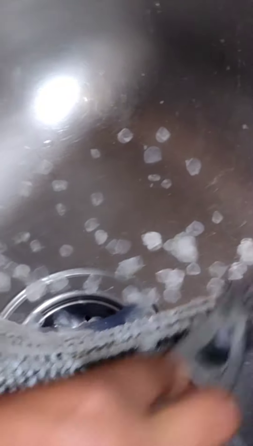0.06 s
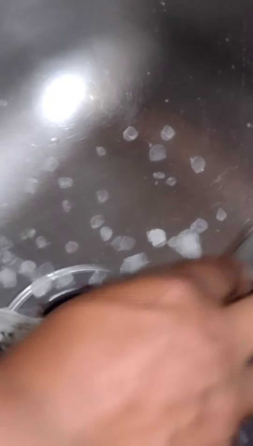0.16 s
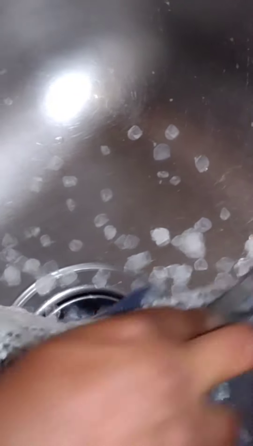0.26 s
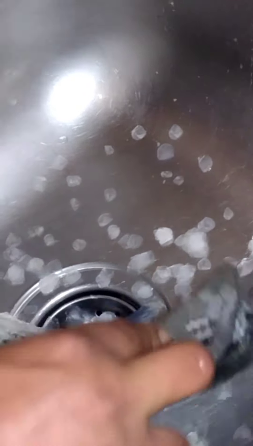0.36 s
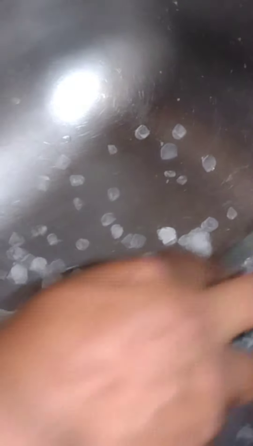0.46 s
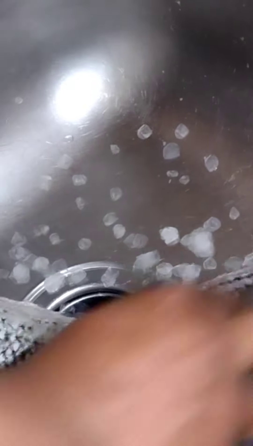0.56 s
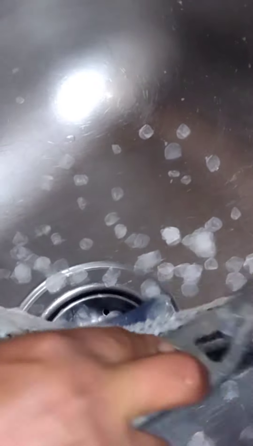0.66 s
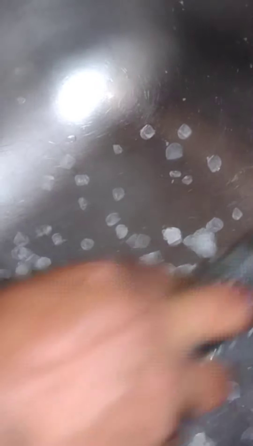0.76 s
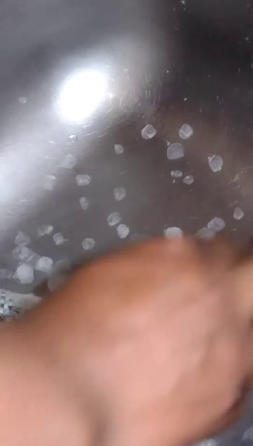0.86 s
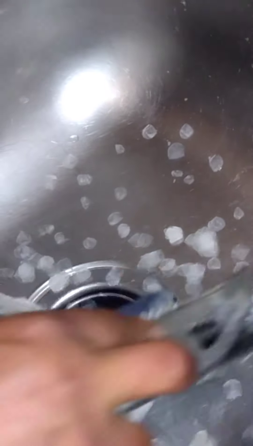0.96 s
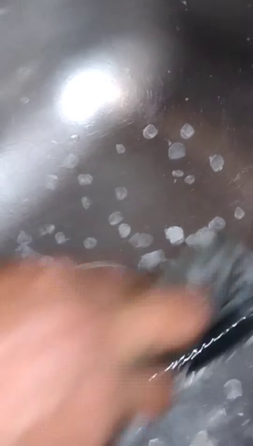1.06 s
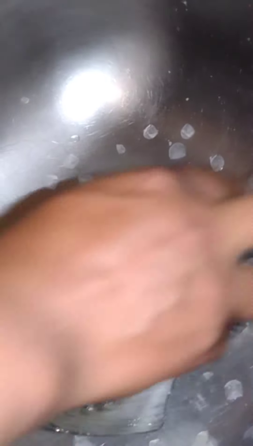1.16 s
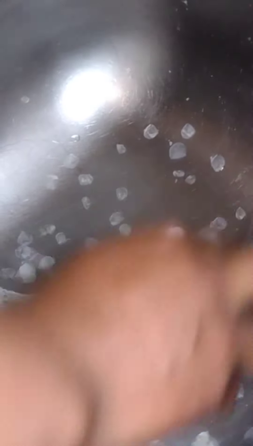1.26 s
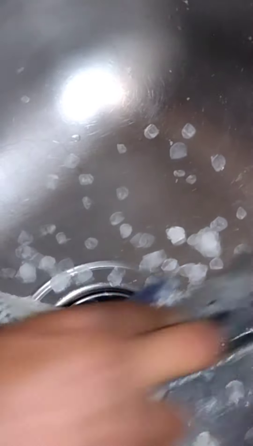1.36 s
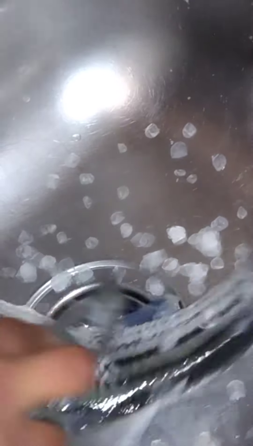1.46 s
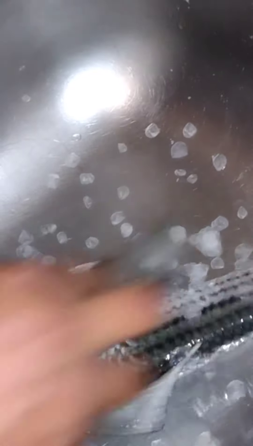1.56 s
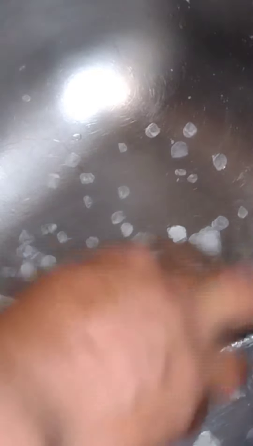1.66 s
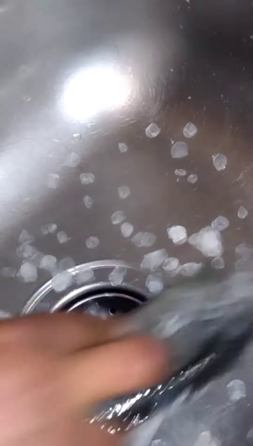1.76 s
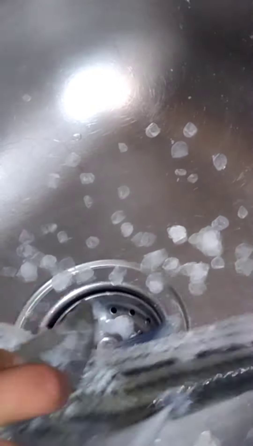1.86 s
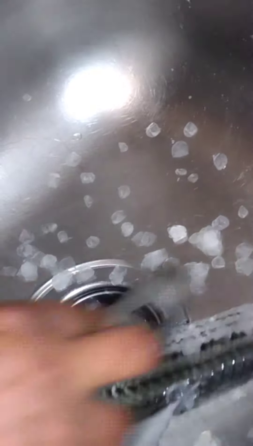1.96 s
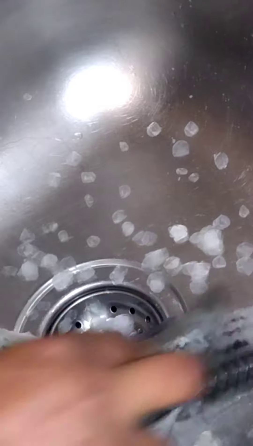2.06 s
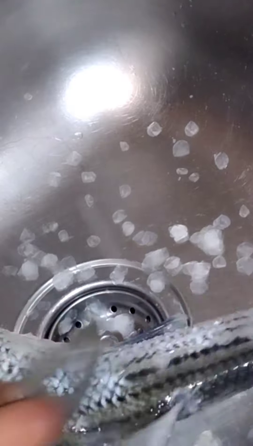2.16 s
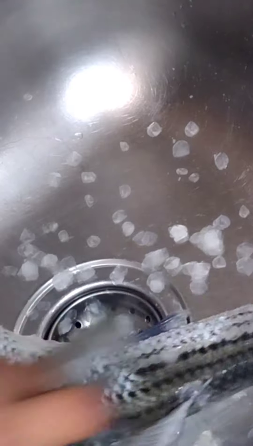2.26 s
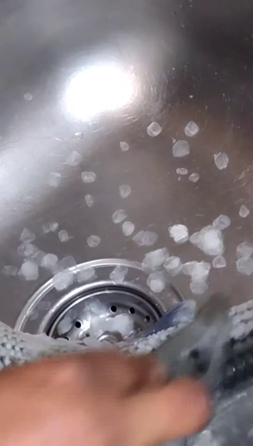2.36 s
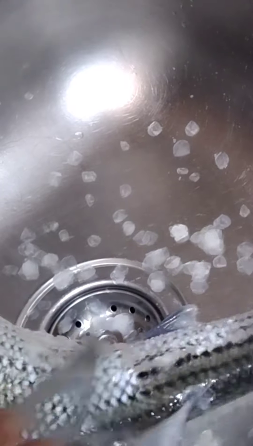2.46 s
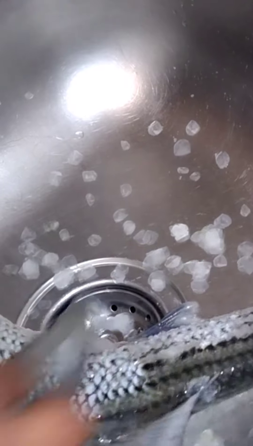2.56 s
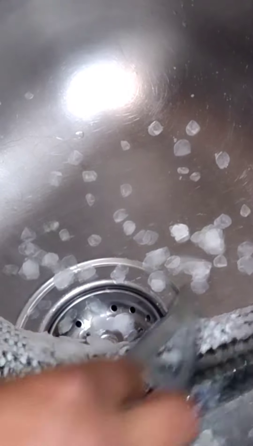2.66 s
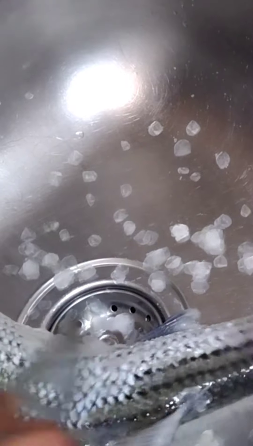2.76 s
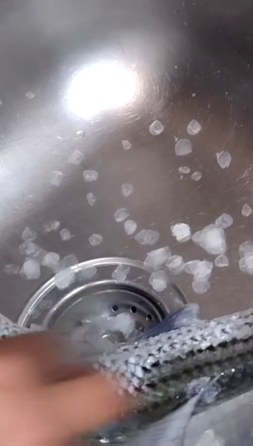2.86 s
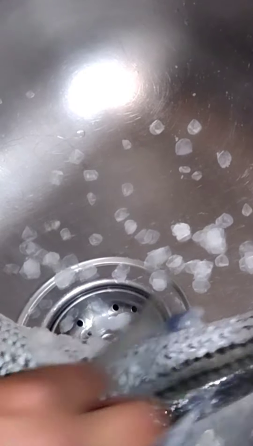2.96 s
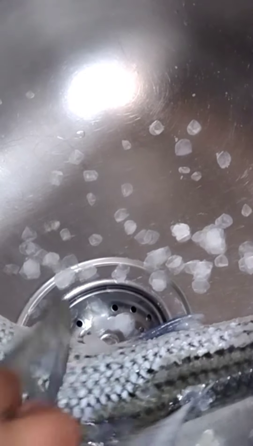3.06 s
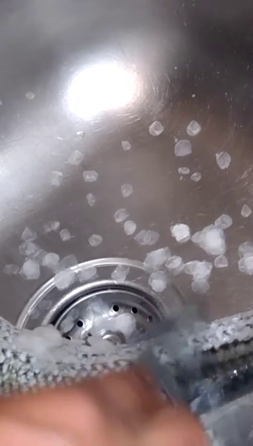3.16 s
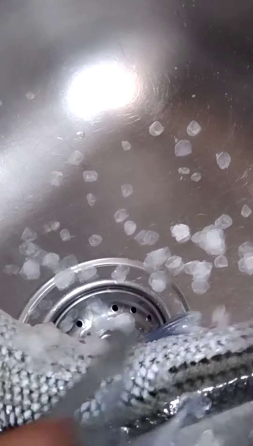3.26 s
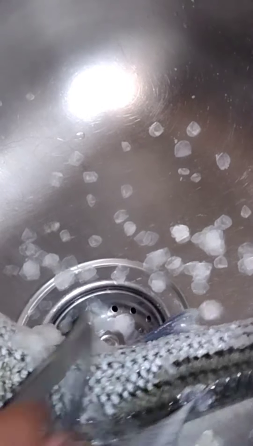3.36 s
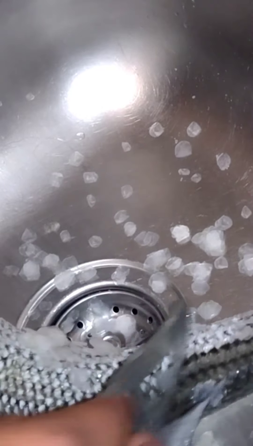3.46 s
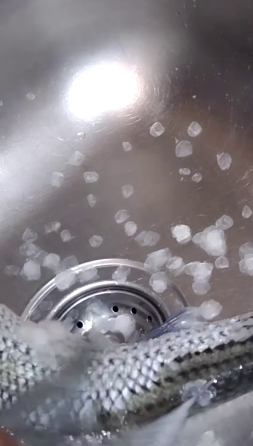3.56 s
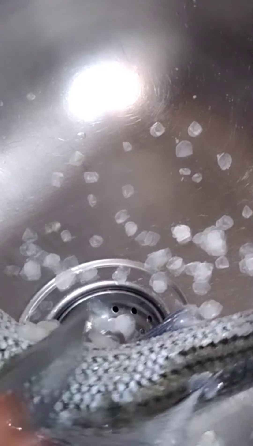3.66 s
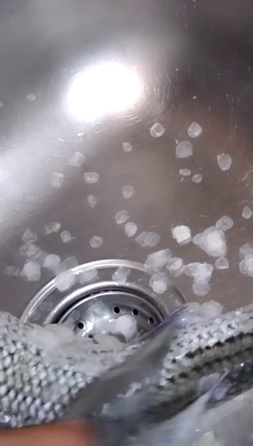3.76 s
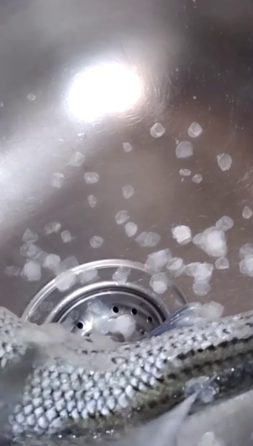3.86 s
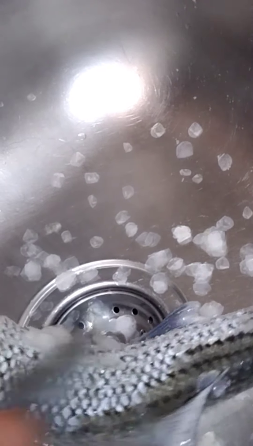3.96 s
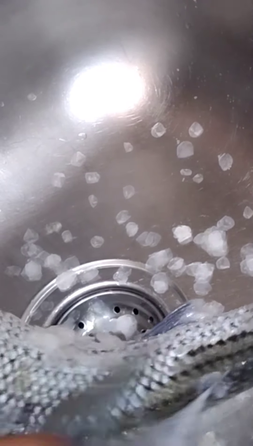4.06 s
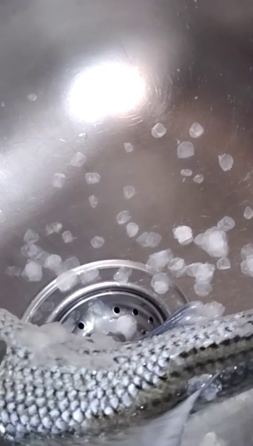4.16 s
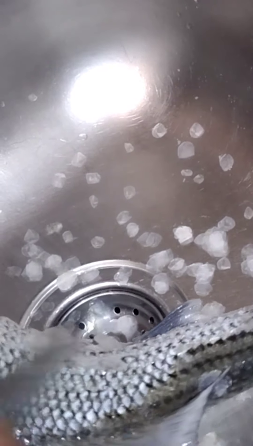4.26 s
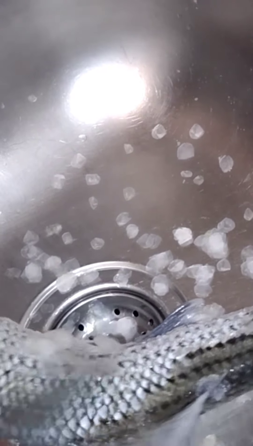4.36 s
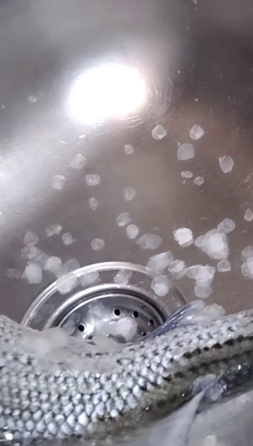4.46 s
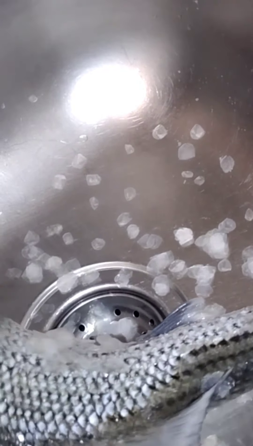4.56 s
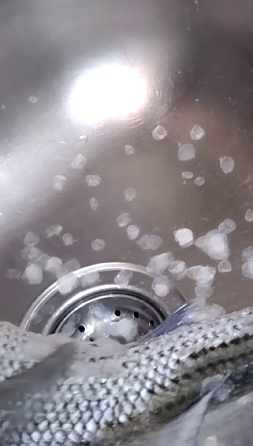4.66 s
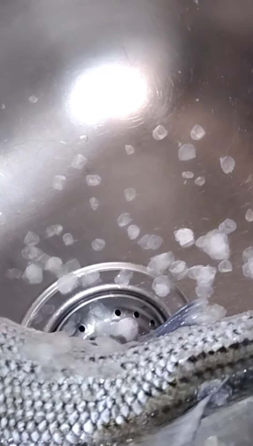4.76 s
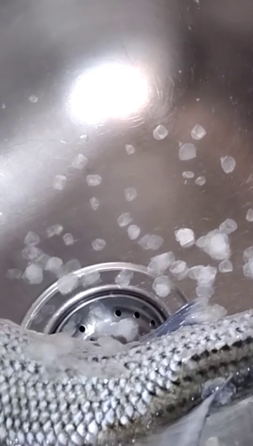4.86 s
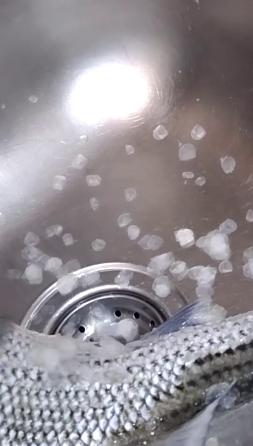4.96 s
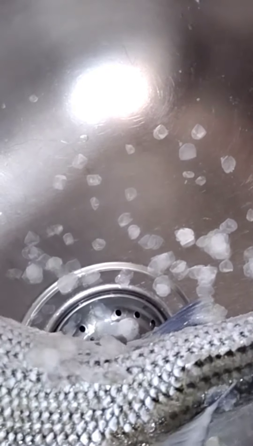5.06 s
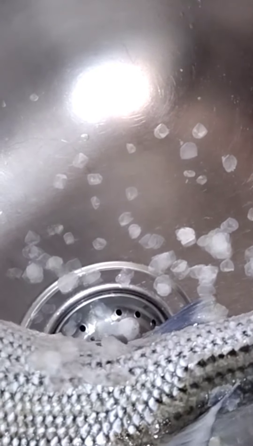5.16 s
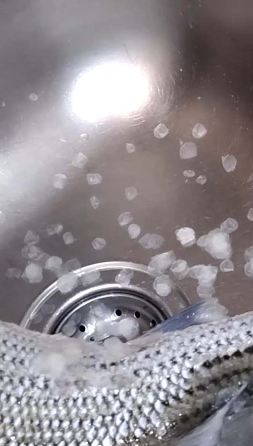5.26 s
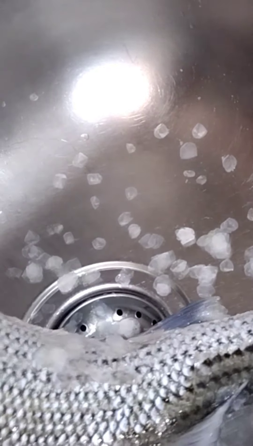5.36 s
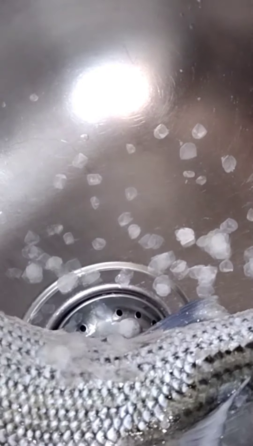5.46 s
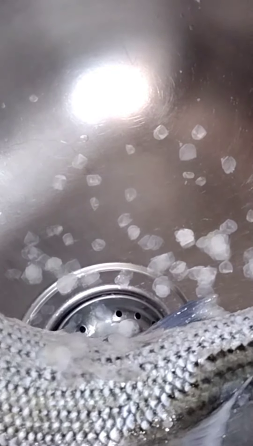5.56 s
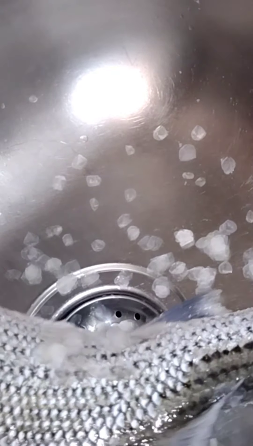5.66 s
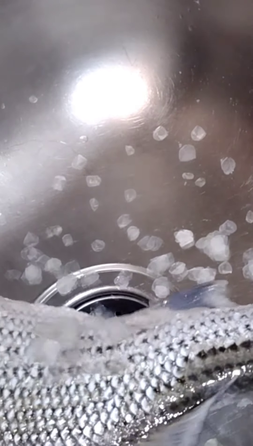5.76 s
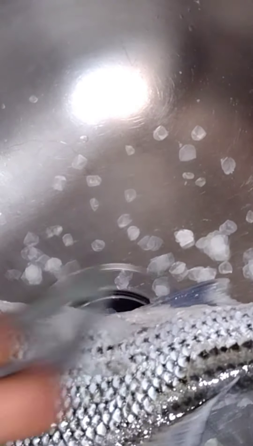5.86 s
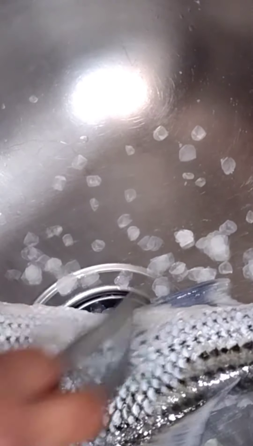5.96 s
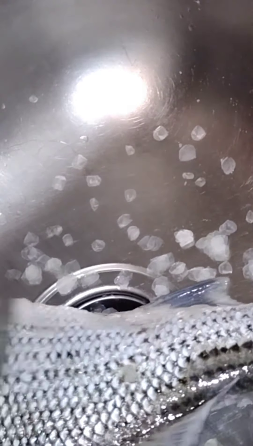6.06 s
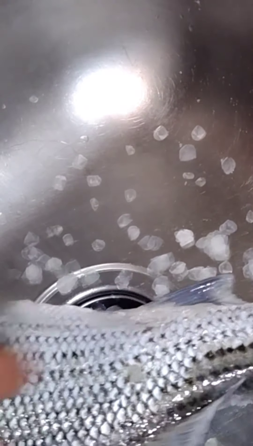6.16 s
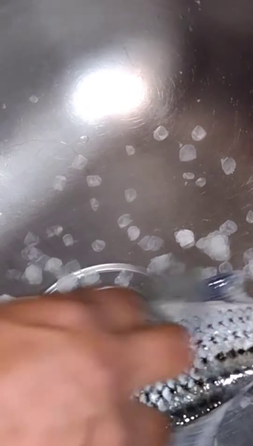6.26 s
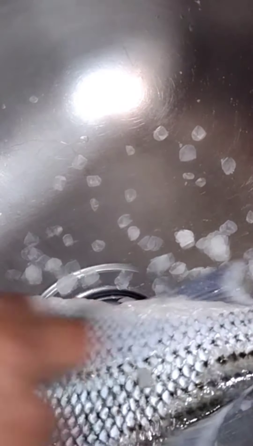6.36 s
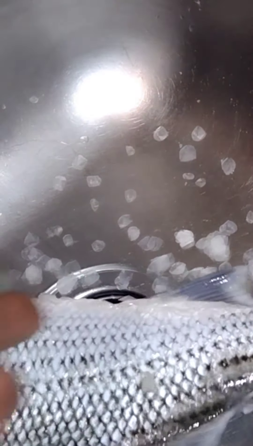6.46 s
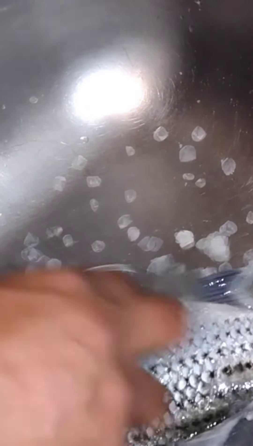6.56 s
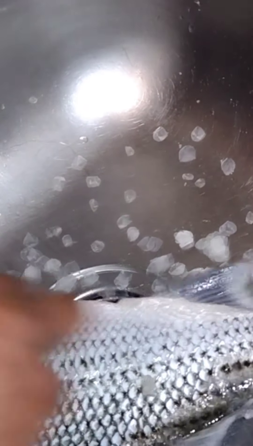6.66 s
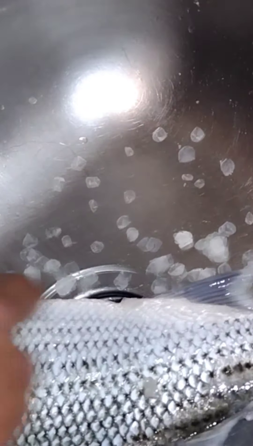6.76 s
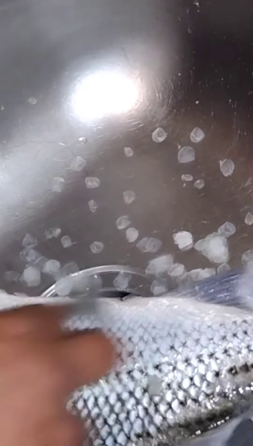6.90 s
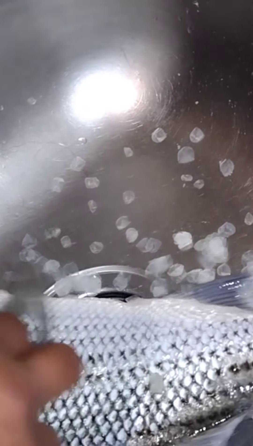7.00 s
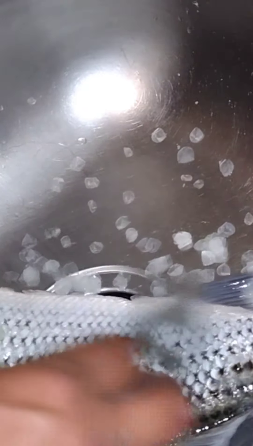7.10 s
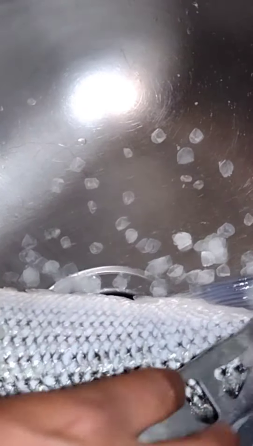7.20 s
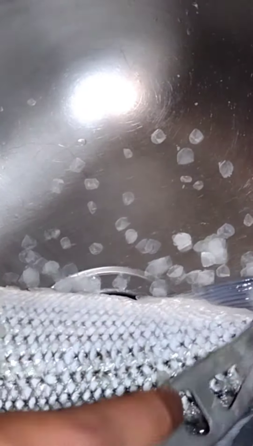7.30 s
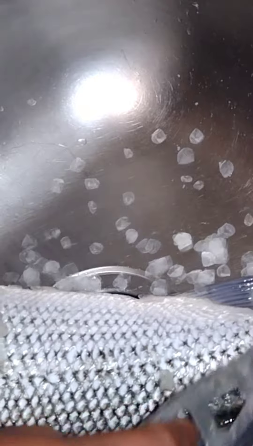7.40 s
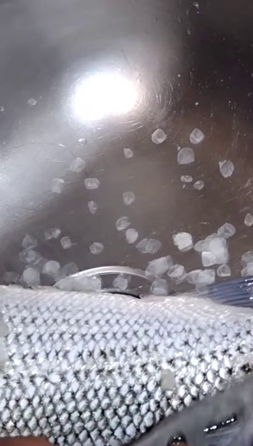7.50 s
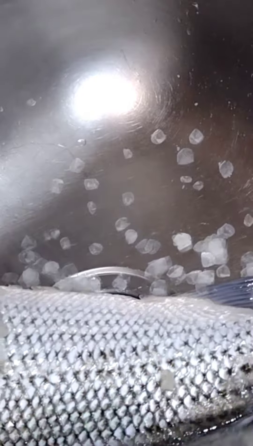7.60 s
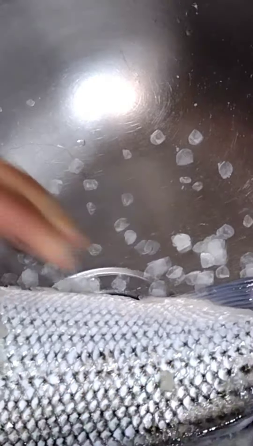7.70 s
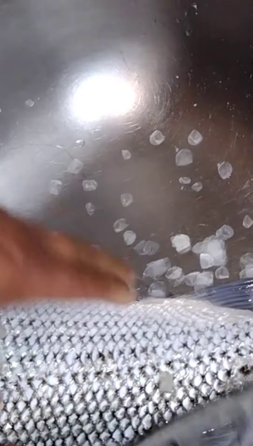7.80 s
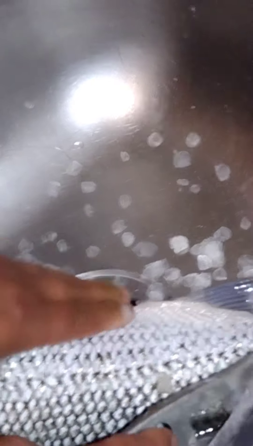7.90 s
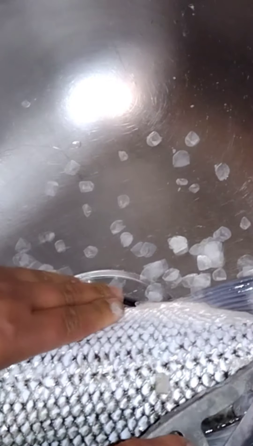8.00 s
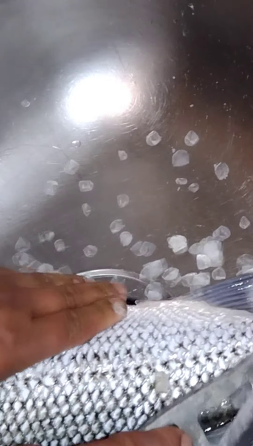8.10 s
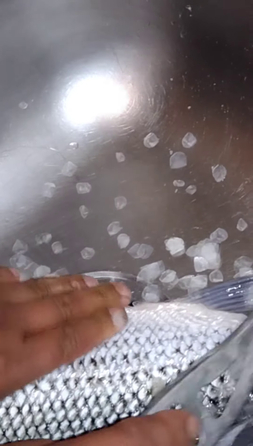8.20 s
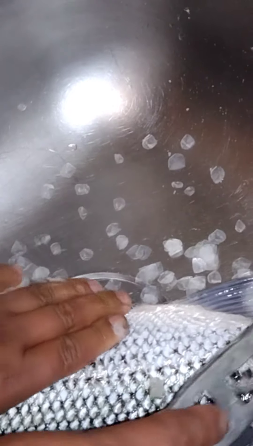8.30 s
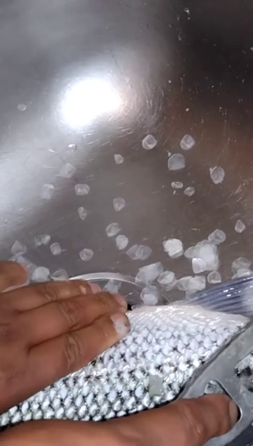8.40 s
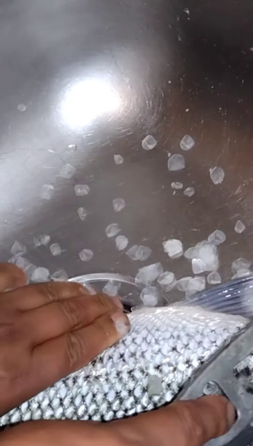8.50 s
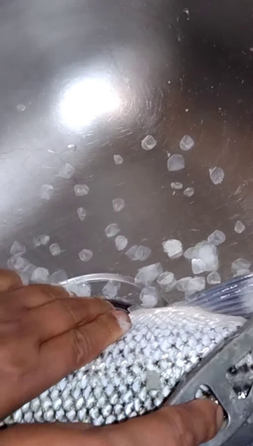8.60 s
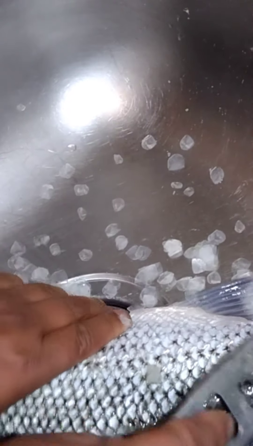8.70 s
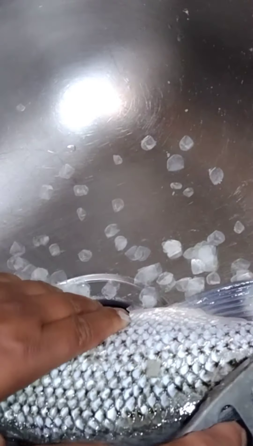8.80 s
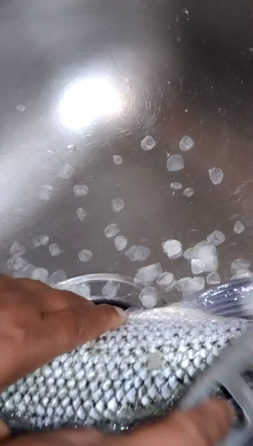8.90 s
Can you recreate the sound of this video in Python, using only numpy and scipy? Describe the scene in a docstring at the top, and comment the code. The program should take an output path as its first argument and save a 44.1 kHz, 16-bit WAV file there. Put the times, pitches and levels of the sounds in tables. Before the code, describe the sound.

Crisp, gritty scraping of fish scales with a thin metallic ring and dull sink thumps, fast then slower, ending in near quiet.

```python
"""A toothed steel scaler is raked over a large fish lying in a steel kitchen sink.
Teeth catch and tear scales: gated noise makes a dense rasp, which rings the tool's resonances.
The tool slides back flat between strokes; each push thuds through the fish into the basin's modes.
At the end the tool and the fingers only brush the skin, over the quiet of the kitchen (steady noise).
Small microphones hear it in stereo, thin in the deep bass and cut at the top."""
import sys
import numpy as np
from scipy import signal
from scipy.io import wavfile
from scipy.ndimage import uniform_filter1d

SR = 44100
rng = np.random.default_rng(int(sys.argv[2]) if len(sys.argv) > 2 else 0)


def inscribe(sig):
    """Save sig as 16-bit PCM at rate SR to the path in sys.argv[1].

    A 1-D sig is mono; a 2-D sig holds one channel per row.
    Samples are clipped to [-1, 1] before scaling.
    """
    pcm = np.round(np.clip(np.atleast_2d(sig).T, -1, 1) * 32767)
    wavfile.write(sys.argv[1], SR, pcm.astype(np.int16))


N = 394254

# Levels in the tables are relative; the mix sets each layer's final loudness.

# Hush of the kitchen: pitch_hz, level_db
KITCHEN_SPECTRUM = [(18, -42), (30, -0.5), (134, 0), (336, -12), (540, -11), (760, -25.5), (913, -20.5),
                    (1910, -18.5), (2230, -30.5), (2980, -28), (16000, -39.5)]
KITCHEN_DB = -59.5

# Pushes that thud the basin: start_s, level_db, walls_db (extra on the wall modes)
THUDS = [(0.032, -44, -13), (0.364, -25, -31), (0.422, -14, -12.5), (0.646, -29.5, -15), (0.721, -35, -7),
         (0.78, -13.5, -12), (1.049, -25, -14), (1.109, -17, -19), (1.222, -24.5, -14), (1.455, -29, -16),
         (1.527, -19.5, -32), (1.617, -23.5, -23), (1.775, -30, -18), (1.844, -21.5, -9),
         (1.964, -16.5, 0.5), (2.229, -48, -24), (2.492, -39, 2), (2.519, -13.5, -21), (2.542, -10.5, -37),
         (2.577, -14.5, -37), (2.801, -10.5, -38), (3.077, -41, -30), (3.315, -19.5, -15),
         (3.351, -13.5, -39), (3.599, -24, -23), (3.619, -40, -25), (3.899, -18.5, -26), (4.181, -40, -36),
         (4.511, -23.5, -4), (4.816, -31.5, -14), (5.158, -33, -5), (5.345, -27.5, -19), (5.661, -35, -7),
         (6.095, -22.5, -24), (6.426, -19, -18), (6.705, -29.5, -24), (6.988, -32, -15), (8.527, -44, 3.5)]
# Basin modes: pitch_hz, level_db, t60_s
BASIN_MODES = [(90, -10, 0.052), (122.2, -7.5, 0.21), (165.4, 1, 0.12), (180, -12.5, 0.12),
               (252, -11, 0.047), (303.3, -4, 0.088), (321.7, -7, 0.054), (416.3, -13, 0.18),
               (476.5, -20.5, 0.22), (532, -11, 0.072), (578.3, -10, 0.086), (599, -17.5, 0.085),
               (675, -15.5, 0.14), (903, -10.5, 0.0097)]
FLOOR_MODES = 4   # the first modes belong to the floor, the rest to the walls

# Teeth snapping over scales, and near the end the hand pressing the fish: start_s, level_db, brightness_db,
# t60_s
SNAPS = [(0.366, -19.5, -18, 0.16), (0.415, -17, -8, 0.09), (0.491, -32.5, 4, 0.09),
         (0.5526, -30, -23, 0.09), (0.6556, -31, -11, 0.09), (0.671, -19.5, -4, 0.12),
         (0.7188, -15, 4, 0.08), (0.7754, -7.5, -12, 0.13), (0.9009, -25.5, -22, 0.11),
         (1.0975, -20, -16, 0.12), (1.2206, -34, -6, 0.078), (1.272, -30, 4, 0.12),
         (1.3848, -38, -16, 0.09), (1.504, -22, 2, 0.12), (1.5238, -6, -5.5, 0.099),
         (1.6207, -26, -18, 0.09), (1.78, -31, -3, 0.09), (1.8033, -16.5, -18, 0.09),
         (1.8457, -7.5, -21, 0.11), (1.8923, -11, 3.5, 0.09), (1.9594, -8, -14, 0.09),
         (1.9706, -5, -11, 0.09), (2.175, -21, -11, 0.16), (2.2263, -14, 10, 0.16),
         (2.4778, -26.5, 8, 0.12), (2.517, -8, -0.5, 0.085), (2.5364, -10.5, 1, 0.16),
         (2.789, -31, -8, 0.09), (2.797, -27, 8, 0.082), (2.819, -13, 2, 0.13), (3.0021, -33, -5, 0.21),
         (3.0535, -39, -12, 0.09), (3.0704, -17, -1, 0.11), (3.3153, -17, -26, 0.09), (3.34, -13, -1, 0.17),
         (3.5907, -37, -11, 0.09), (3.6277, -31, 4, 0.09), (3.889, -13.5, -6, 0.11),
         (4.1485, -30, -25, 0.099), (4.1703, -25, -6, 0.09), (4.4528, -44, -8, 0.09),
         (4.772, -26, -17, 0.076), (4.7845, -22, -24, 0.09), (4.796, -9.5, -40, 0.09),
         (4.8134, -16, -12, 0.099), (4.8824, -25, 4, 0.047), (5.0714, -23.5, -22, 0.11),
         (5.3682, -43, -7, 0.09), (5.4278, -17, -10, 0.066), (5.4832, -27.5, -29, 0.084),
         (5.5129, -45, -15, 0.09), (5.5373, -39, -5, 0.09), (5.586, -28.5, -1, 0.079),
         (5.6302, -32, -3, 0.07), (5.658, -18.5, -9.5, 0.09), (5.6714, -26.5, -8, 0.085),
         (6.0611, -35, -7, 0.07), (6.086, -23, -14, 0.09), (6.097, -19.5, -15, 0.1),
         (6.4203, -16.5, -14, 0.083), (6.709, -21, -14, 0.12), (6.963, -27.5, -21, 0.09),
         (6.9824, -21, -19, 0.11), (7.445, -36.5, -8, 0.09), (7.4904, -36, -6, 0.065),
         (7.5318, -40, 2, 0.17), (7.654, -32, -3, 0.066), (7.8431, -45.5, -3.5, 0.09),
         (8.0204, -43, -11, 0.09), (8.0448, -38, -13, 0.084), (8.155, -44, -3, 0.19),
         (8.1945, -40.5, 0, 0.09), (8.4741, -52, -5, 0.09), (8.514, -41, -17, 0.097),
         (8.8634, -42.5, -11, 0.09)]
# Colour of the rasp: pitch_hz, density_db (per Hz)
RASP_SPECTRUM = [(400, -32), (620, -14), (1000, -18.5), (1700, -13.5), (2800, -7), (4500, -7.5),
                 (7000, -11.5), (10500, -14), (13500, -9.5), (15700, -7)]

# Strokes that catch scales: start_s, bite_s (time to full bite), length_s, rasp_db,
# brightness_db (top), fullness_db (mids), floor_load_db, wall_load_db,
# three free_hz (pitches the grip leaves free), free_db (their gain),
# damping (by the flesh, 0-1), catching (0-1, low = smooth)
STROKES = [(0.0, 0.027, 0.066, -40.5, 2, -3.5, -34, -43, 2230, 3180, 7000, 10.8, 1, 0.17),
           (0.333, 0.1, 0.13, -36, -4.5, -2.5, -27.5, -39.5, 1590, 2400, 3180, 6.5, 0.68, 0.97),
           (0.549, 0.027, 0.08, -40.5, -6.5, 1, -39, -38, 1730, 2200, 5700, 7.2, 0.72, 0.63),
           (.65, 0.078, 0.13, -33, -3, -9, -30, -45.5, 3100, 4340, 5600, 3.4, 0.82, 0.52),
           (0.77, .02, 0.059, -32.5, -8, 3, -18, -24, 1800, 2950, 4400, 10, 0.38, 0.82),
           (.9, 0.13, 0.34, -41, -2, -1, -37, -43.5, 1700, 2260, 3180, 8.8, 0.71, 0.58),
           (1.093, 0.021, 0.056, -31, -10.5, -2.5, -24.5, -28.5, 1500, 1770, 2910, 15, 0.6, 0.38),
           (1.208, 0.016, 0.044, -38, -2.5, 0, -45, -38, 2200, 5600, 7150, 6.7, 0.6, 0.98),
           (1.385, 0.065, 0.17, -36.5, -2, -7.5, -33.5, -47.5, 4140, 5440, 7060, 5.7, .67, 0.75),
           (1.519, 0.013, 0.082, -35.5, -19, 7.5, -21.5, -33.5, 1494, 3060, 7120, 6.7, 0.35, 0.93),
           (1.613, 0.0096, 0.059, -38, -3, 1.5, -32.5, -39.5, 1600, 2960, 7260, 7, 0.65, 0.73),
           (1.78, 0.034, 0.078, -35, -5.5, -9.5, -29, -45, 1800, 4100, 5600, 3.8, 0.81, 0.6),
           (1.845, 0.017, 0.052, -27, -13, -3, -22, -28, 1730, 4150, 5600, 8.6, .6, 1),
           (1.957, 0.0085, 0.056, -29.5, -7, -3, -21, -27.5, 1710, 2270, 2970, 7.6, 1, 0.81),
           (2.166, 0.09, 0.12, -29.5, -4.5, -9, -18.5, -39.5, 2430, 3960, 6600, 4.3, 0.49, 0.55),
           (2.473, 0.063, 0.13, -31, -5, -7.5, -22, -44, 2320, 3260, 5130, 4.6, 0.52, 1),
           (2.787, 0.084, 0.097, -32, -7, -4.5, -20.5, -40.5, 3130, 5000, 6500, 4.3, 0.48, .9),
           (3.051, 0.043, 0.079, -30, -7, -5.5, -18.5, -39.5, 3250, 5500, 6230, 6.8, 0.39, 0.91),
           (3.304, 0.048, 0.1, -35, -3, -7, -28.5, -41, 4000, 5600, 7100, 4, 0.74, 0.56),
           (3.588, 0.052, 0.11, -34.5, 0.5, -8.5, -26.5, -39, 2140, 3300, 7240, 2.6, 0.55, 0.98),
           (3.883, 0.012, 0.094, -33, -1.5, -7.5, -28, -38, 2180, 6540, 7240, 2.7, 0.65, 1),
           (4.149, 0.048, 0.12, -32.5, -3, -8, -26.5, -35, 3330, 3950, 6540, 7.9, 0.45, 0.51),
           (4.447, 0.1, 0.13, -30, -5.5, -14, -30.5, -32, 2120, 4050, 5750, 5.4, 0.25, .75),
           (4.77, 0.044, 0.12, -33, -8.5, -19, -33, -32.5, 1830, 3170, 5740, 12, 0.55, 0.93),
           (5.067, 0.044, 0.13, -39.5, -9, -15.5, -46, -37.5, 1890, 3240, 4060, 5, 0.58, 0.77),
           (5.358, 0.048, 0.092, -43.5, -11, -10, -39, -34, 2104, 3870, 6060, 13.7, 0.66, 0.24),
           (5.584, 0.0088, .065, -54, 0, -13, -55, -49, 1830, 3320, 5640, 13.3, .45, 0.74),
           (5.655, 0.028, 0.055, -45, -27, -26, -44, -34.5, 1930, 3230, 5600, 11.7, 0.71, 0.97),
           (6.085, 0.037, 0.079, -33.5, -4.5, -15, -31, -38.5, 2330, 4230, 5600, 8, .95, 0.7),
           (6.418, .015, 0.089, -31.5, -3.5, -9, -31, -32, 2230, 4050, 5480, 7.9, .5, 0.61),
           (6.705, .05, 0.11, -33.5, -6.5, -7.5, -38, -32.5, 2080, 4050, 5300, 6.4, 0.81, 0.77),
           (6.962, 0.038, 0.093, -40, -12, -3.5, -31.5, -37.5, 1910, 2170, 3250, 9.2, 0.36, 0.6),
           (7.439, 0.057, .13, -54.5, -5.5, -2, -55, -72, 4260, 5600, 8290, 9.5, .2, 0.74),
           (7.56, 0.12, 0.11, -54, 3.5, -14.5, -66, -78, 3200, 5000, 6330, 7.7, 0.11, .8),
           (8.045, 0.026, 0.042, -58.5, -5, -26, -74, -85, 1890, 6950, 8290, 7, 0.24, .6),
           (8.19, .02, 0.1, -61, -2, -21, -58, -81, 2230, 5000, 7680, 6.7, .6, 1),
           (8.32, 0.03, 0.14, -61.5, -1, -28, -65, -77.5, 3400, 5300, 6600, 7.7, .16, 1)]
FIRST_TOUCH_DB, LAST_TOUCH_DB = -7, -8.5   # start and end of a stroke against its full bite
LAND_DB_PER_S, LIFT_DB_PER_S = 2501, 501

# The tool or the fingers slide flat over the skin: start_s, length_s, rasp_db,
# brightness_db, fullness_db, floor_load_db, wall_load_db
SLIDES = [(0.053, 0.051, -45.5, -12.5, 3.5, -39.5, -46), (0.21, 0.098, -48, -6.5, -2, -42, -51.5),
          (0.474, 0.13, -50, -16, 4.5, -35, -44), (0.84, 0.1, -50, -13, 6.5, -35, -48),
          (1.172, 0.09, -49, -14, 18, -37, -38.5), (1.25, 0.12, -55, -1.5, -2, -49, -50),
          (1.664, 0.064, -59.5, -12, 3, -51, -55), (2.02, .06, -51, -12, 4.5, -38.5, -41.5),
          (2.295, 0.16, -50.5, -8.5, 1, -45.5, -50.5), (2.593, 0.11, -53, -9, 3, -42, -47.5),
          (2.747, .04, -53, -16, -2, -35, -53), (2.887, 0.068, -50, -3, -1, -39, -50.5),
          (3.141, 0.057, -51.5, -10, 0, -43, -49), (3.227, 0.077, -47, -7.5, -5, -38.5, -50),
          (3.367, 0.19, -49, -1.5, -3, -46, -56.5), (3.732, 0.18, -51.5, -2, -4, -44.5, -56),
          (4.037, 0.1, -50.5, -10, -4, -48, -52), (4.283, .11, -55, -8, -2.5, -48.5, -54),
          (4.59, 0.14, -58, -13, -0.5, -51, -53), (4.91, 0.11, -57.5, -12, -3, -51, -55),
          (5.21, 0.28, -65.5, -12, -2, -57, -58.5), (5.463, 0.13, -57.5, -11, -7, -52.5, -51.5),
          (5.694, 0.2, -53, -19.5, -4.5, -52, -58), (6.175, 0.39, -51.5, -11, -5, -51.5, -52.5),
          (6.547, 0.4, -59.5, -11, 1, -51, -57), (6.826, .12, -54, -10, -1, -56, -55),
          (7.072, .37, -55, -10, 0, -53.5, -58.5), (8.516, 0.11, -62.5, -11, 6, -53, -51.5),
          (8.601, 0.25, -53.5, -9.5, -9, -56, -68), (8.862, 0.097, -63, -13, -3, -60, -74)]
SLIDE_EDGE_DB, SLIDE_FADE_DB_PER_S = -5.5, 241   # a slide swells from this and sinks back to it
# Pitches left free in a slide: free_hz
SLIDE_FREE_HZ = [1710, 2240, 3200]
SLIDE_FREE_DB, SLIDE_DAMPING, SLIDE_CATCHING = 3, 0.87, 0.33

LEAN_IN_S, LEAN_IN_DB = 0.02, -7.5   # the fish is pressed down before the teeth bite
CHANGE_S = 0.012   # the grip passes from one contact to the next

# Scaler resonances when it rings freely: pitch_hz, width_hz, level_db
SCALER_MODES = [(1442, 5.8, -4), (1743, 15, -5), (1921, 17, 4.5), (2250, 55, -0.5), (2723, 66, -5),
                (3231, 45, 1.5), (3510, 14, -10), (3612, 49, 1.5), (4005, 46, -5), (4140, 17, -5.5),
                (5000, 25, -12), (5010, 180, -5), (5610, 30, -3.5), (6120, 23, -14.5), (6230, 30, -10),
                (6600, 96, -3), (7080, 120, -5.5), (7655, 97, 1.5), (8250, 57, -1), (9160, 150, -4),
                (9650, 63, -9), (10480, 52, -2), (11260, 50, -6), (12500, 37, -8), (12500, 57, -8),
                (13900, 24, -0.5), (14600, 28, 3), (15770, 45, 1), (15600, 84, 1.5)]
HELD_DB, FREE_OCTAVES = -2, 0.13   # modes far from a free pitch; reach of a free pitch
DAMPED_WIDENING = 6.1   # flesh widens a mode by this factor

# Stereo likeness: pitch_hz, likeness (correlation of left and right)
LIKENESS = [(60, .997), (130, .995), (200, .97), (290, .8), (640, .5), (1410, .05), (3100, .01),
            (6820, .35), (10000, .55), (15000, .6)]
# Stereo lean: pitch_hz, lean_db (left minus right)
LEAN = [(60, 6), (150, -3), (380, 2), (950, 2), (2380, -8.5), (5980, -8.5), (15000, 1.5)]
# Phase of the ringing tool: pitch_hz, lead_rad (by which the left leads)
LEAD = [(340, .2), (1460, .4), (1890, 2.0), (2150, .7), (2760, .6), (3190, 3.1), (3960, 1.1), (5170, 3.3),
        (5680, 5.6), (6200, 6.2), (6250, 0), (16000, 0)]
# Microphone limits
ROLL_OFF_HZ, CUTOFF_HZ = 75, 15760


def from_db(db):
    """Gain of a level in dB."""
    return 10 ** (np.asarray(db) / 20)


def rms_one(x):
    """Scaled to rms 1."""
    return x / np.sqrt(np.mean(x ** 2) + 1e-20)


def at_hz(points, hz):
    """Value of a spectrum on a log-frequency axis."""
    points = np.array(points)
    return np.interp(np.log(hz), np.log(points[:, 0] + 1), points[:, 1])


def drift(rate_hz):
    """Slow chance of spread 1: noise through a double one-pole low-pass, run in."""
    # drawn at an eighth of the sample rate
    r = np.exp(-16 * np.pi * rate_hz / SR)
    noise = rng.standard_normal(N // 8 + 4002)
    slow = signal.lfilter([1], [1, -2 * r, r * r], noise)[4000:]
    return np.interp(np.arange(N) / 8, np.arange(len(slow)), rms_one(slow))


def resonate(x, hz, width_hz):
    """Two-pole resonance with gain 1 on top."""
    r = np.exp(-np.pi * width_hz / SR)
    zeros = np.array([1, 0, -1]) * (1 - r * r) / 2
    poles = [1, -2 * r * np.cos(2 * np.pi * hz / SR), r * r]
    return signal.lfilter(zeros, poles, x)


def to_stereo(mid, side, hz):
    """Places one band: likeness and lean of the two channels at that pitch."""
    alike = np.clip(at_hz(LIKENESS, hz), -1, 1)
    lean_db = at_hz(LEAN, hz)
    pair = np.sqrt(1 + alike) * mid + np.sqrt(1 - alike) * side * [[1], [-1]]
    return from_db([[lean_db / 2], [-lean_db / 2]]) * pair / np.sqrt(2)


def bands(low_hz, step_octaves):
    """Neighbouring bands up to at most 19 kHz as (centre, filter)."""
    edges = low_hz * 2 ** np.arange(0, np.log2(19000 / low_hz), step_octaves)
    return [(np.sqrt(a * b), signal.butter(2, [a, b], "band", fs=SR, output="sos"))
            for a, b in zip(edges, edges[1:])]


def quiet():
    """The steady hush of the kitchen: noise coloured band by band."""
    white = rng.standard_normal((2, 2, N))
    hush = 0
    for k, (hz, sos) in enumerate(bands(38.3, 0.679)):
        mid, side = signal.sosfilt(sos, white[k % 2])
        hush = hush + from_db(at_hz(KITCHEN_SPECTRUM, hz)) * to_stereo(mid, side, hz)
    return from_db(KITCHEN_DB) * rms_one(hush)


def tearing(per_s, spread_db, burst_s):
    """Envelope of scales tearing loose at random, each a short burst; rms 1."""
    torn = rng.random(N) < per_s / SR
    sizes = from_db(spread_db * np.minimum(rng.exponential(1, N), 4)) * torn
    decay = np.exp(-2 / (burst_s * SR))   # of the power
    power = signal.lfilter([1], [1, -decay], sizes ** 2 + 1e-18)
    return rms_one(np.sqrt(power))


def basin(floor_db, wall_db):
    """Rubbing load and soft single pushes drive the basin's decaying modes."""
    judder = rng.standard_normal((2, N)) * tearing(per_s=140.0, spread_db=2.0, burst_s=0.0078)
    at = [round(row[0] * SR) for row in THUDS]
    peak_db, extra_wall_db = np.transpose(THUDS)[1:]
    share_db = rng.normal(0, 1.0, (len(at), len(BASIN_MODES)))   # each push excites the modes unevenly
    out = [0, 0]   # floor, walls
    for k, (hz, db, t60) in enumerate(BASIN_MODES):
        wall = int(k >= FLOOR_MODES)
        load_db = wall_db - 25.5 if wall else floor_db - 30.0
        # the load reaches each mode by its own path
        force = np.roll(judder, 37 * k, axis=1) * from_db(load_db)
        force[:, at] += from_db(peak_db - 5.5 + wall * extra_wall_db + share_db[:, k])
        r = from_db(-60 / (t60 * SR))
        w = 2 * np.pi * hz / SR
        mid, side = signal.lfilter([0, np.sin(w)], [1, -2 * r * np.cos(w), r * r], force)
        out[wall] = out[wall] + from_db(db) * to_stereo(mid, side, hz)
    # flesh cushions the blow: the floor sounds round, the walls hollow
    floor_band = signal.butter(2, [70, 240], "band", fs=SR, output="sos")
    wall_band = signal.butter(2, [220, 1000], "band", fs=SR, output="sos")
    return signal.sosfilt(floor_band, out[0]) + signal.sosfilt(wall_band, out[1])


def contacts():
    """Each stroke and slide has its swell; the strongest contact at each moment sets the controls."""
    t = np.arange(0, N / SR + 0.002, 0.001)
    swells, rows = [], []
    for s, bite, length, *row in STROKES:
        corners = [s, s + min(bite, length), s + length]
        swell = np.interp(t, corners, [FIRST_TOUCH_DB, 0, LAST_TOUCH_DB])
        swell -= LAND_DB_PER_S * np.maximum(s - t, 0)
        swell -= LIFT_DB_PER_S * np.maximum(t - s - length, 0)
        swells.append(swell)
        rows.append(row)
    for s, length, *row in SLIDES:
        off = np.abs(t - s - length / 2)   # time from the middle of the slide
        swell = SLIDE_EDGE_DB * np.minimum(2 * off / length, 1) ** 2
        swell -= SLIDE_FADE_DB_PER_S * np.maximum(off - length / 2, 0)
        swells.append(swell)
        rows.append(row + SLIDE_FREE_HZ + [SLIDE_FREE_DB, SLIDE_DAMPING, SLIDE_CATCHING])
    swells, rows = np.array(swells), np.array(rows)

    strongest = np.argmax(swells + rows[:, :1], axis=0)
    controls = uniform_filter1d(rows[strongest], max(round(CHANGE_S * 1000), 1), axis=0).T
    # rasp, floor load and wall load each follow their own loudest contact
    for k in (0, 3, 4):
        controls[k] = np.max(swells + rows[:, k:k + 1], axis=0)
    lean_in = np.interp(t + LEAN_IN_S, t, controls[3]) + LEAN_IN_DB
    controls[3] = np.maximum(controls[3], lean_in)
    controls[5:8] = rows[strongest, 5:8].T   # the free pitches change at once
    return [np.interp(np.arange(N) / SR, t, c) for c in controls]


def snaps(bright):
    """Envelope of the single snaps: a crack and a dying tail; bright 0-1 weighs their treble."""
    power = np.zeros(N)
    for s, peak_db, top_db, t60 in SNAPS:
        at = round(s * SR)
        age = np.arange(min(N - at, SR // 5)) / SR
        crack = 1 + 1.5 * np.exp(-age / 0.001)
        tail_db = peak_db + bright * (top_db + 6.0) - 60 * age / max(t60, 0.01)
        power[at:at + len(age)] += crack * from_db(2 * tail_db)
    return np.sqrt(power)


def rasp(rasp_db, top_db, full_db, catching):
    """Tearing and snaps gate noise that is coloured band by band."""
    tear = tearing(per_s=430.0, spread_db=4.0, burst_s=0.014) * from_db(0.45 * drift(32))
    # single teeth tick on top
    ticks = tearing(per_s=250, spread_db=3, burst_s=0.001)
    tear = tear * np.sqrt(0.55 + 0.45 * ticks ** 2)
    # a smooth contact evens the tearing out
    catching = np.clip(catching, 0, 1)
    tear = np.sqrt(catching * tear ** 2 + 1 - catching)

    white = rng.standard_normal((2, 2, N))
    snap_mid, snap_top = snaps(0), snaps(0.58)
    out = 0
    for k, (hz, sos) in enumerate(bands(507.0, 0.4923)):
        bright = np.clip(np.log2(hz / 5000), 0, 1)   # share of the treble control
        full = np.clip(np.log2(2400 / hz), 0, 1)   # share of the mid control
        level_db = rasp_db + bright * (top_db + 3.0) + full * (full_db + 11.5)
        snap_gain = from_db(-13.5 + full * (full_db + 3.0))
        snap = snap_gain * (bright * snap_top + (1 - bright) * snap_mid)
        gate = np.hypot(from_db(level_db + 2.0) * tear, snap)
        gate = gate * from_db(2.28 * catching * drift(14))   # every clump of scales has its own colour
        mid, side = signal.sosfilt(sos, white[k % 2] * gate)
        out = out + from_db(at_hz(RASP_SPECTRUM, hz) + 8.0) * to_stereo(mid, side, hz)
    return out


def scaler(scales, free_hz, free_db, damping):
    """The rasp rings in the tool; flesh widens the modes; each reaches the channels with its own phase."""
    damping = np.clip(damping, 0, 1)
    out = scales * np.sqrt(damping)   # a free tool lets little of the raw rasp through
    for hz, width, db in SCALER_MODES:
        octaves_off = np.log2(hz / np.array(free_hz))
        near = np.exp(-(octaves_off / FREE_OCTAVES) ** 2).max(axis=0)
        grip_db = HELD_DB + (free_db - HELD_DB) * near
        drive = scales * from_db(db + 4.5 + grip_db + 3.22 * drift(11.0))
        drive[1] = 0.54 * drive[0] + 0.65 * drive[1]   # the right shares the left's drive
        free = resonate(drive * np.sqrt((1 - damping) * DAMPED_WIDENING), hz, width)
        damped = resonate(drive * np.sqrt(damping) * from_db(-4.5), hz, width * DAMPED_WIDENING)
        left, right = free + damped
        lag = round(at_hz(LEAD, hz) / (2 * np.pi * hz) * SR)
        out += [left, np.roll(right, lag) * from_db(-0.5)]
    return out


def scene():
    """Kitchen, basin, and the scaler rung by the scales."""
    rasp_db, top_db, full_db, floor_db, wall_db, *free_hz, free_db, damping, catching = contacts()
    scales = rasp(rasp_db, top_db, full_db, catching)
    tool = scaler(scales, free_hz, free_db, damping)
    return tool + basin(floor_db, wall_db) + quiet()


def record(dry):
    """The small microphones lose the deep bass; the top is cut."""
    high_pass = signal.butter(2, ROLL_OFF_HZ, "high", fs=SR, output="sos")
    top_cut = signal.ellip(12, 0.5, 50, CUTOFF_HZ, fs=SR, output="sos")
    return signal.sosfilt(top_cut, signal.sosfilt(high_pass, dry))


dry = scene()
out = record(dry)
inscribe(out)
```